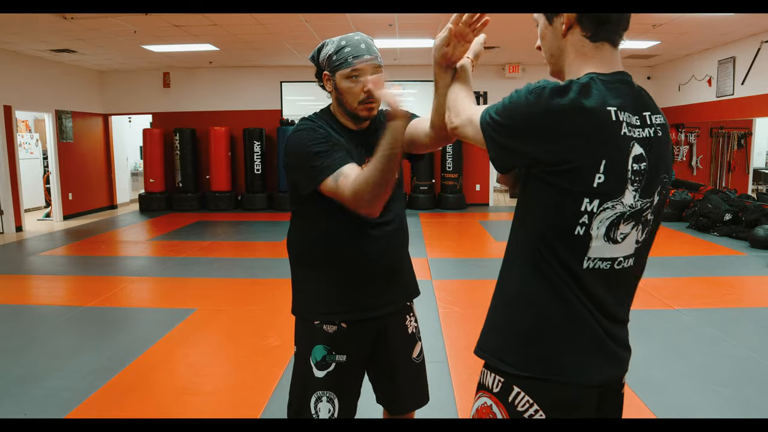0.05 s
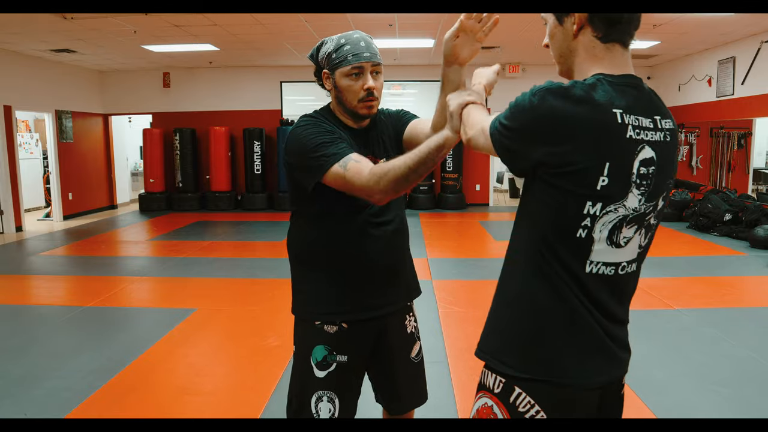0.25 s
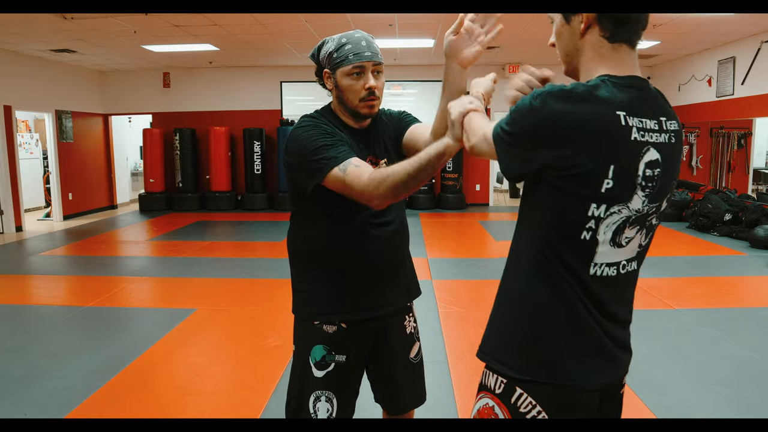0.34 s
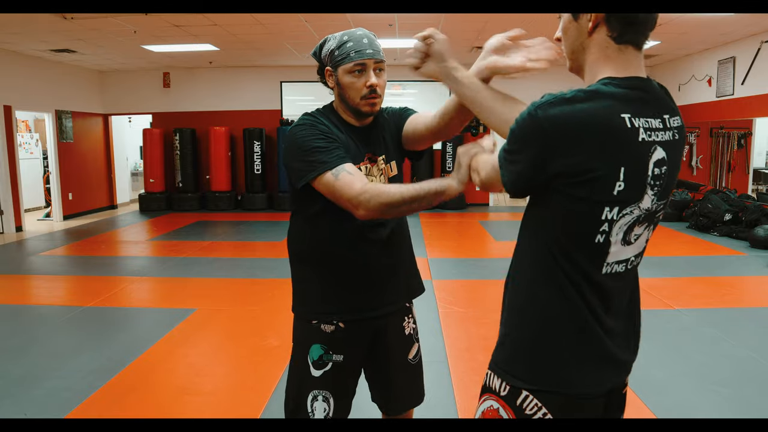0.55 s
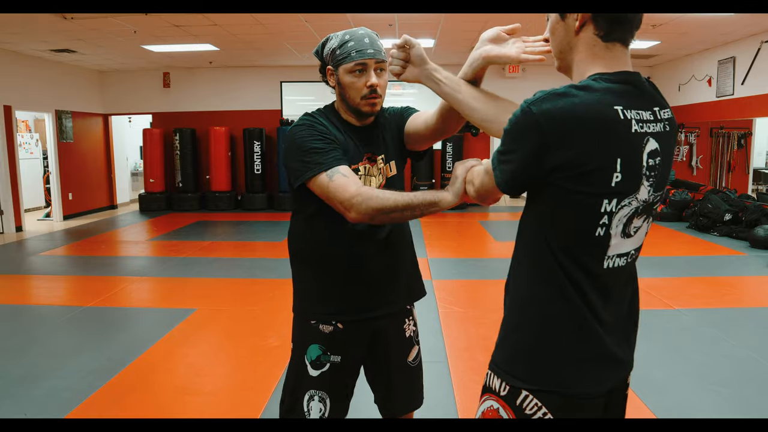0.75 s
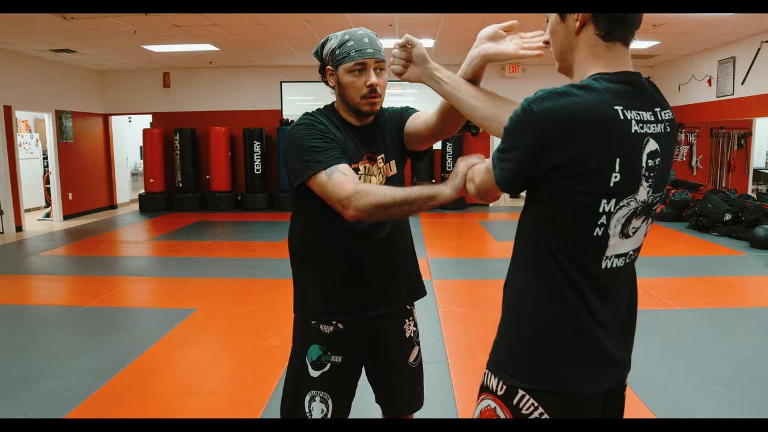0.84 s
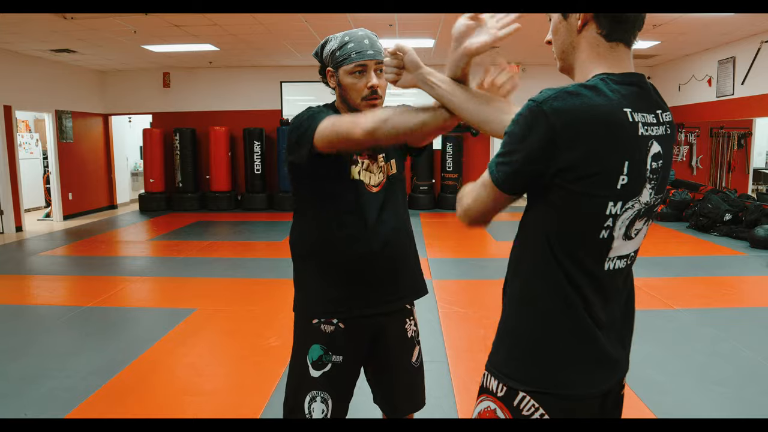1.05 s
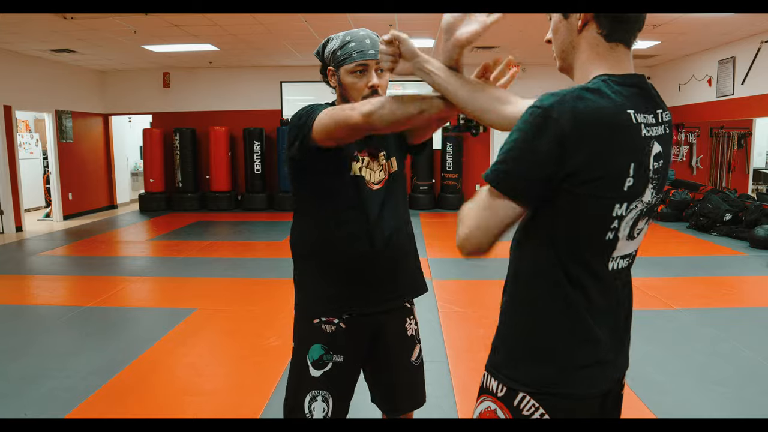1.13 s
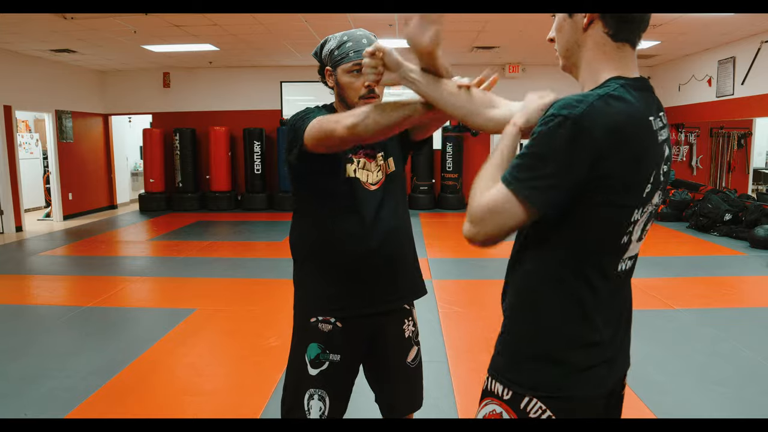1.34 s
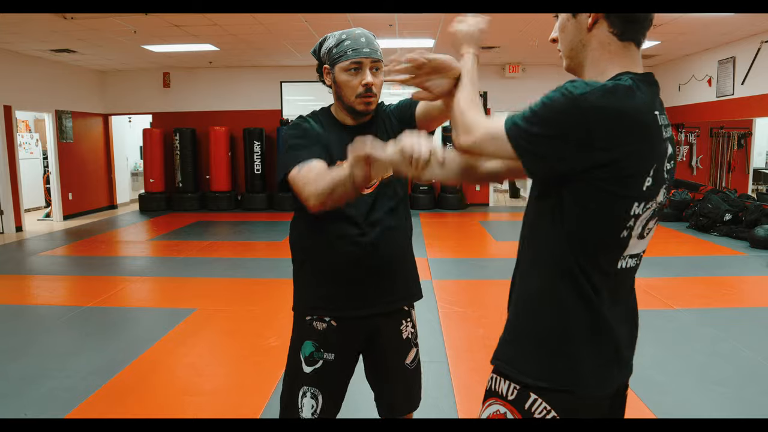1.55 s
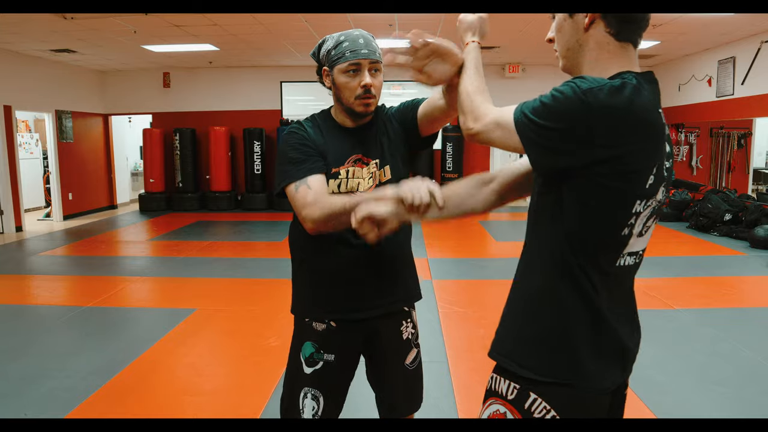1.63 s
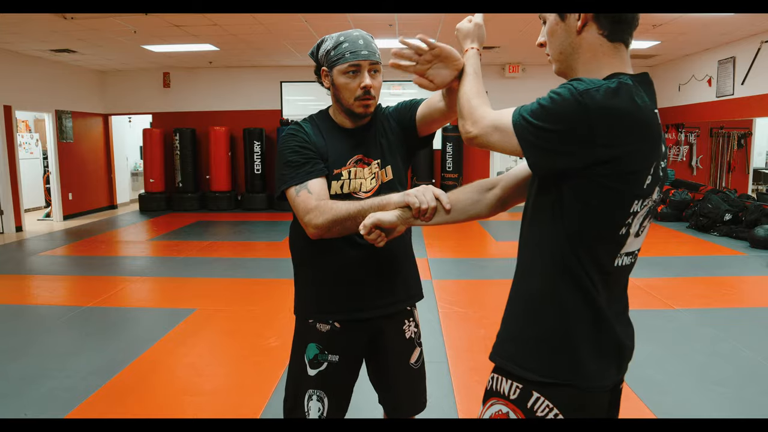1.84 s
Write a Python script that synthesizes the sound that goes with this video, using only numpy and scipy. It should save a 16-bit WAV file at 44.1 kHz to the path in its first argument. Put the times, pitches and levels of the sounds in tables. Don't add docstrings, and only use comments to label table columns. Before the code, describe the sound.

Two people's hands and forearms meet in a big indoor hall: one bright, distorted slap with a short reverberant tail, then very quiet brushing and light taps above low air noise, picked up closely.

```python
import sys
import numpy as np
from scipy import signal
from scipy.fft import rfft, irfft
from scipy.io import wavfile

SR = 44100
rng = np.random.default_rng(int(sys.argv[2]) if len(sys.argv) > 2 else 0)


def transcribe(signal):
    frames = np.atleast_2d(signal).T
    limited = np.clip(frames, -1, 1)
    pcm = np.round(limited * 32767).astype(np.int16)
    wavfile.write(sys.argv[1], SR, pcm)


def nominal_scale(level):
    x = np.asarray(level, float) / 20
    return 10 ** x


N = 83790
POCKET_CUT_HZ = 640


def rms_one(x):
    return x / np.sqrt(np.mean(x ** 2) + 1e-20)


def at_hz(points, hz):
    table = np.array(points)
    return np.interp(np.log(hz), np.log(table[:, 0]), table[:, 1])


def colour(x, spectrum):
    hz = np.maximum(np.arange(len(x) // 2 + 1) * SR / len(x), 1)
    return rms_one(irfft(rfft(x) * nominal_scale(at_hz(spectrum, hz)), len(x)))


def drift(rate_hz):
    knots = rng.standard_normal(int(N / SR * 120) + 9)
    return np.interp(np.arange(N) / SR * rate_hz, np.arange(len(knots)), knots)


def high_pass(x, cut_hz):
    return signal.sosfilt(signal.butter(3, cut_hz, "high", fs=SR, output="sos"), x + 1e-18)


def rings(rows):
    rise_cycles = 0.25
    t = np.arange(N) / SR
    out = np.zeros(N)
    for start_s, level_db, hz, t60_s in rows:
        age = np.maximum(t - start_s, 0)
        build = 1 - np.exp(-age * hz / rise_cycles)
        out += nominal_scale(level_db - 60 * age / t60_s) * build * np.sin(2 * np.pi * hz * age)
    return out


def contacts(rows, cut_hz):
    rung = []
    for start_s, peak_db, hz, cycles in rows:
        rung.append((start_s, peak_db + 25 / cycles, hz, cycles / hz))
    return high_pass(rings(rung), cut_hz)


def grains():
    grains_per_s, spread_db = 30000, 1.2
    sizes = nominal_scale(spread_db * np.minimum(rng.exponential(1, N), 5)) * rng.standard_normal(N)
    return sizes * (rng.random(N) < grains_per_s / SR)


# start_s, peak_db, pitch_hz, ring_cycles
PALM_LANDINGS = [
    (.2013, 0, 1500, 3.2),
    (.2021, 0, 2600, 6),
    (.2033, -6, 2100, 5),
    (.2038, 0, 3380, 28),
    (.2047, -4, 4400, 16),
    (.2059, 2, 3900, 6),
    (.2075, -9, 3300, 12),
    (.2084, -7, 2600, 9),
    (.2091, -12, 5500, 9),
    (.2098, -4, 4400, 8),
]


def palm_slap():
    return contacts(PALM_LANDINGS, POCKET_CUT_HZ)


# start_s, peak_db, pitch_hz, ring_cycles
FINGER_SNAPS = [
    (0.2013, -2.5, 8400, 14),
    (0.204, 2.5, 10380, 16),
    (0.687, -43, 11000, 6.9),
    (1.6438, -30, 9000, 10),
    (1.6467, -27, 10500, 5.8),
]


def finger_snaps():
    return contacts(FINGER_SNAPS, POCKET_CUT_HZ)


# start_s, peak_db, pitch_hz, ring_cycles
NEAR_ECHOES = [
    (.2156, -15, 2800, 4),
    (.2177, -12, 3500, 7),
    (.2195, -19, 3500, 5),
    (.2256, -18, 3800, 8),
    (.2286, -19, 2000, 4),
]


def near_echoes():
    return contacts(NEAR_ECHOES, POCKET_CUT_HZ)


# start_s, level_db, pitch_hz, t60_s
FLESH_THUMPS = [
    (.2012, -23, 175, 0.042),
    (.2016, -20.5, 250, .035),
    (.2014, -16.5, 499.6, .03),
    (.203, -19, 640, 0.016),
    (1.058, -54, 660, 0.016),
    (1.4, -40, 209, .06),
    (1.647, -46, 460, 0.033),
    (1.6455, -49.5, 830, 0.023),
]


def flesh_thumps():
    return high_pass(rings(FLESH_THUMPS), 125)


# start_s, hold_s
SKIN_SPREADS = [
    (.2002, .001),
    (.2013, .005),
    (.6305, .0015),
    (.6745, .001),
    (.684, .005),
    (1.0556, .003),
    (1.6443, .0058),
    (1.65, .004),
]
# t60_s, dull_db, bright_db
SKIN_DECAYS = [
    (0.0054, -33.5, -42.5),
    (0.032, -16, -27),
    (0.015, -52, -64),
    (.02, -66, -50),
    (0.026, -58, -52),
    (0.018, -56, -61),
    (.006, -46.5, -46),
    (0.082, -61, -57),
]
# frequency_hz, level_db per Hz
CRACKLE_SPECTRUM = [(240, -11), (400, -20), (1460, -24), (2220, -8), (3370, -5), (6640, -21.5),
                    (10700, -16.5), (16000, -71)]
# frequency_hz, level_db per Hz
BRIGHT_SPECTRUM = [(3500, -30.5), (6500, -15), (8200, -0.5), (11800, -1.5), (14900, -1.5), (16000, -3)]


def skin_crackle():
    t = np.arange(N) / SR
    dull = colour(rng.standard_normal(N), CRACKLE_SPECTRUM)
    bright = colour(grains(), BRIGHT_SPECTRUM)
    out = np.zeros(N)
    for (start_s, hold_s), (t60_s, dull_db, bright_db) in zip(SKIN_SPREADS, SKIN_DECAYS):
        fade = nominal_scale(-60 * np.maximum(t - start_s - hold_s, 0) / t60_s)
        out += (t > start_s) * fade * (nominal_scale(dull_db) * dull + nominal_scale(bright_db) * bright)
    return out


# start_s, peak_db, pitch_hz, ring_cycles
LIGHT_TAPS = [
    (.631, -41.5, 3500, 4.5),
    (1.057, -35.5, 2200, 1.4),
    (1.0571, -42.5, 4350, 2.5),
    (1.0584, -53, 1503, 2.37),
    (1.0624, -43.5, 2550, 1.8),
    (1.6445, -35.5, 2580, 10),
    (1.6443, -38, 800, 2.2),
]


def light_taps():
    return -contacts(LIGHT_TAPS, cut_hz=360)


# start_s, peak_s, end_s, dull_db, bright_db
SKIN_SLIDES = [(0.638, .65, 0.7, -67, -60), (0.676, 0.693, 0.73, -62.5, -55), (0.723, 0.752, .76, -75, -64),
               (.92, 0.939, 0.98, -60, -59.5), (1.073, 1.114, 1.165, -62.5, -63.5),
               (1.131, 1.207, 1.343, -71.5, -78), (1.432, 1.459, 1.498, -60.5, -61.5),
               (1.46, 1.509, 1.569, -56, -53), (1.527, 1.581, 1.644, -54.5, -57.5),
               (1.666, 1.703, 1.75, -60, -59.5), (1.675, 1.683, 1.7, -73, -60)]
# frequency_hz, level_db per Hz
SLIDE_SPECTRUM = [(530, -46), (900, -27), (1360, -10.5), (2200, -5.5), (2720, -8.5), (4080, -3),
                  (7000, -11.5), (9100, -32), (15400, -120)]


def skin_slides():
    edge_db = -16
    t = np.arange(N) / SR
    dull, bright = np.zeros(N), np.zeros(N)
    for start_s, peak_s, end_s, dull_db, bright_db in SKIN_SLIDES:
        from_peak = np.interp(t, [start_s, peak_s, end_s], [1, 0, 1])
        stroke = (from_peak < 1) * nominal_scale(edge_db * from_peak ** 3.0)
        dull += nominal_scale(dull_db) * stroke
        bright += nominal_scale(bright_db) * stroke
    rough = nominal_scale(0.82 * drift(35))
    return rough * (dull * colour(grains(), SLIDE_SPECTRUM) + bright * colour(grains(), BRIGHT_SPECTRUM))


# frequency_hz, t60_s
HALL_DECAY = [(150, 0.43), (400, .55), (900, .5), (1840, 0.64), (4000, 0.78), (7000, .58), (10500, 0.67),
              (13500, 0.45), (16000, .25)]


def hall():
    onset_s = 0.013
    clump_db, clump_per_s, clump_fade_s = 2.5, 55, 0.15
    far_wall_db, far_wall_s, far_wall_spread_s = 2, 0.075, 0.03
    t = np.arange(SR) / SR
    edges_hz = 90 * 2 ** np.arange(0, 7.6, 0.5)
    white = rng.standard_normal((2, SR))
    tail = np.zeros(SR)
    for k, (low, high) in enumerate(zip(edges_hz, edges_hz[1:])):
        band_pass = signal.butter(2, [low, high], "band", fs=SR, output="sos")
        band = signal.sosfilt(band_pass, white[k % 2])
        clumps = clump_db * np.exp(-t / clump_fade_s) * drift(clump_per_s)[:SR]
        tail += band * nominal_scale(clumps - 60 * t / at_hz(HALL_DECAY, np.sqrt(low * high)))
    swell = far_wall_db * np.exp(-((t - far_wall_s) / far_wall_spread_s) ** 2)
    onset = np.clip(t / onset_s, 0, 1) ** 2
    return rms_one(tail * nominal_scale(swell) * onset) / np.sqrt(SR)


# frequency_hz, level_db per Hz
SLAP_SPECTRUM = [(88, -41.5), (150, -12), (1080, -12.5), (1260, -7), (2760, -4), (4410, -3), (10600, -16),
                 (16000, -35.5)]


def slap_in_hall():
    energy_db = 5
    start = int(PALM_LANDINGS[0][0] * SR)
    late = np.pad(hall(), (start, N))[:N]
    return nominal_scale(energy_db) * colour(late, SLAP_SPECTRUM) / np.sqrt(N) * (np.arange(N) > start)


# frequency_hz, level_db per Hz
AIR_SPECTRUM = [(15, -28.5), (30, -6), (60, -3), (110, -2.5), (240, -13), (530, -17), (1400, -25),
                (2600, -32.5), (16000, -36.5)]
# pitch_hz, rms_db
HUM_TONES = [(59.5, -78), (178, -69.5), (240, -71), (9750, -87)]
# centre_s, length_s, rms_db
DUCT_BOOMS = [
    (.07, 0.13, -56.5),
    (0.761, .03, -59.5),
    (1.401, 0.05, -59.5),
    (1.52, .04, -57.5),
    (1.79, .06, -56),
]


def ventilation():
    boom_hz, air_db = 105.7, -58
    t = np.arange(N) / SR
    out = nominal_scale(air_db + 1.0 * drift(12)) * colour(rng.standard_normal(N), AIR_SPECTRUM)
    for hz, rms_db in HUM_TONES:
        out += np.sqrt(2) * nominal_scale(rms_db + 0.86 * drift(7)) * np.sin(2 * np.pi * hz * t)
    boom = np.zeros(N)
    for centre_s, length_s, rms_db in DUCT_BOOMS:
        boom += np.sqrt(2) * nominal_scale(rms_db) * np.exp(-((t - centre_s) / length_s) ** 2)
    boom_phase = 2 * np.pi * np.cumsum(boom_hz + 5 * drift(12)) / SR
    return out + boom * np.sin(boom_phase)


def scene():
    slap, flesh = palm_slap(), flesh_thumps()
    light = skin_slides() + light_taps()
    direct = slap + finger_snaps() + near_echoes() + flesh + skin_crackle() + light
    sent_to_hall = nominal_scale(-11) * light + nominal_scale(-21.0) * (slap + flesh)
    reverb = slap_in_hall() + signal.fftconvolve(sent_to_hall, hall())[:N]
    return (direct + reverb + ventilation())[None]


def band_limit(x):
    return signal.sosfilt(signal.butter(12, 16640, fs=SR, output="sos"), x)


def record(dry):
    top_cut = signal.cheby2(12, 26, 16000, fs=SR, output="sos")
    mix = np.clip(signal.sosfilt(top_cut, dry), -1.0, 1.0)
    return band_limit(mix)


dry = scene()
out = record(dry)
transcribe(out)
```